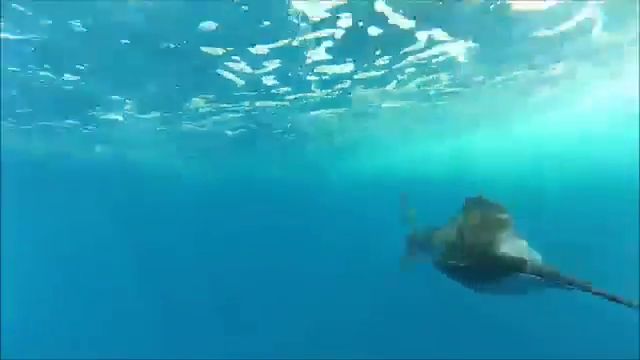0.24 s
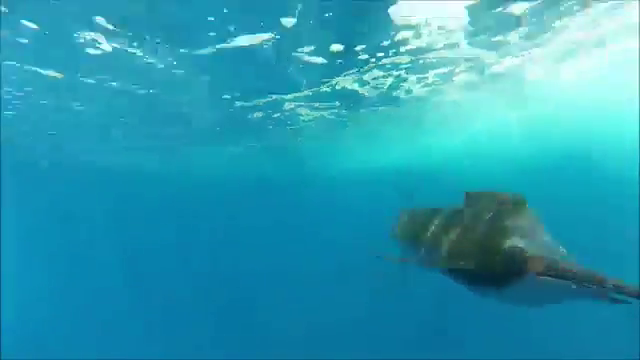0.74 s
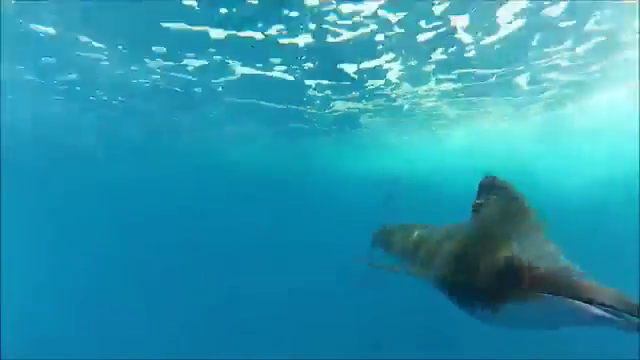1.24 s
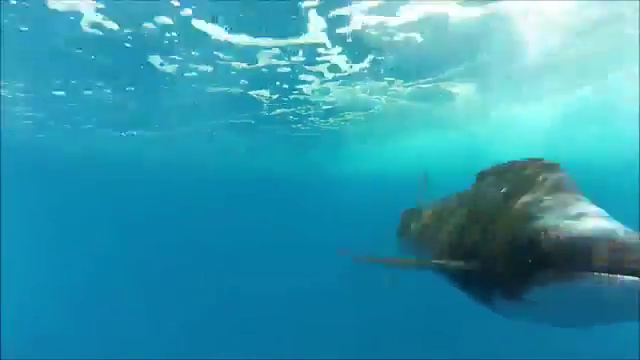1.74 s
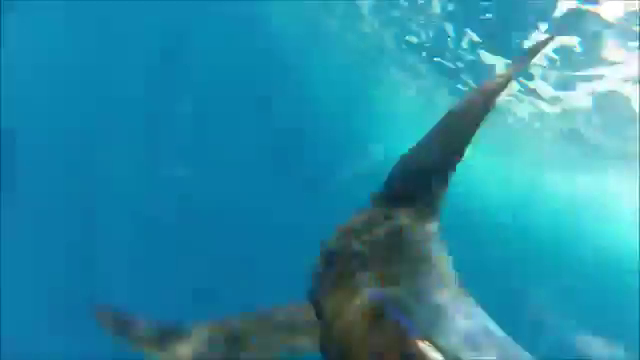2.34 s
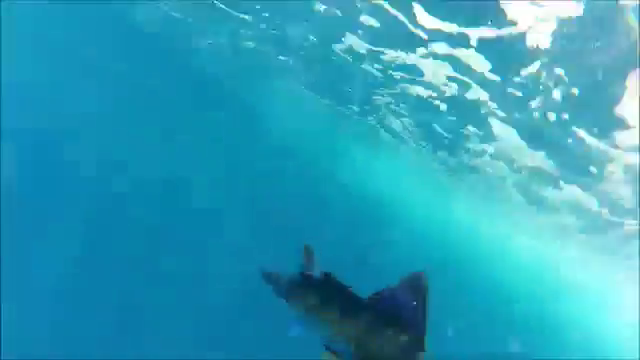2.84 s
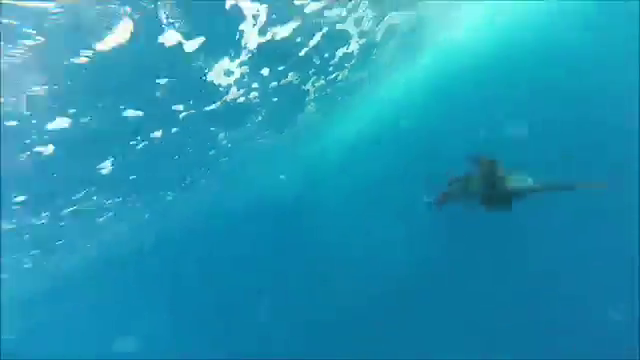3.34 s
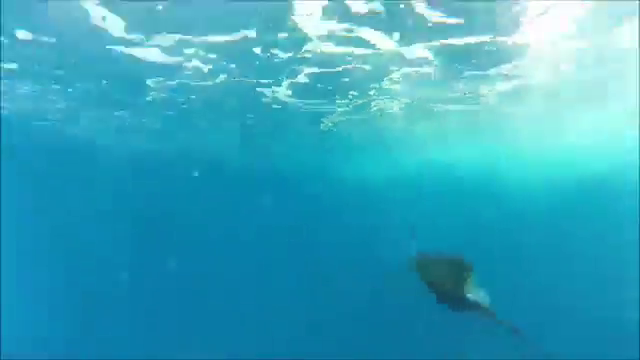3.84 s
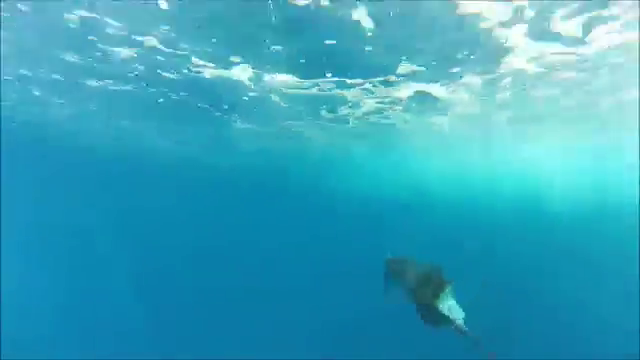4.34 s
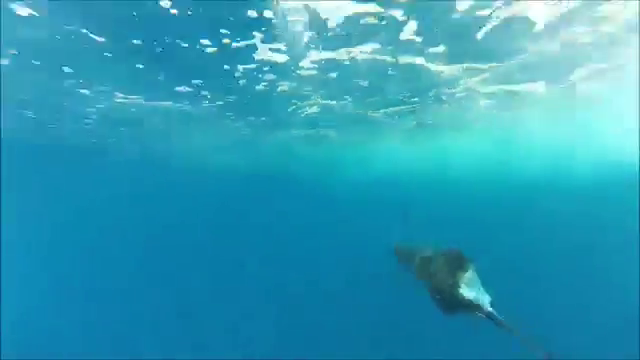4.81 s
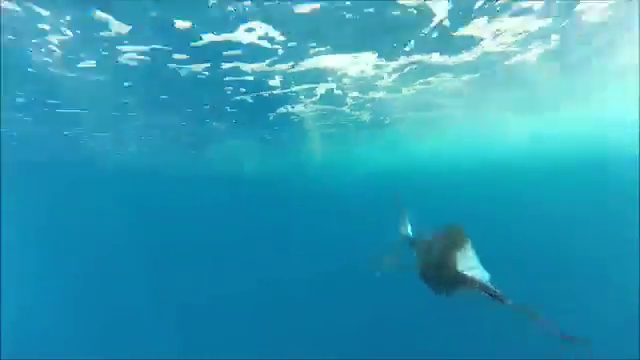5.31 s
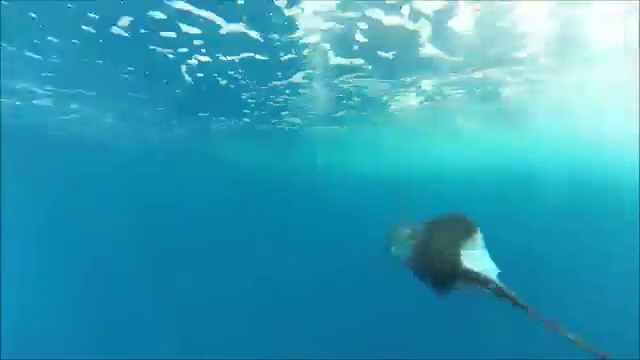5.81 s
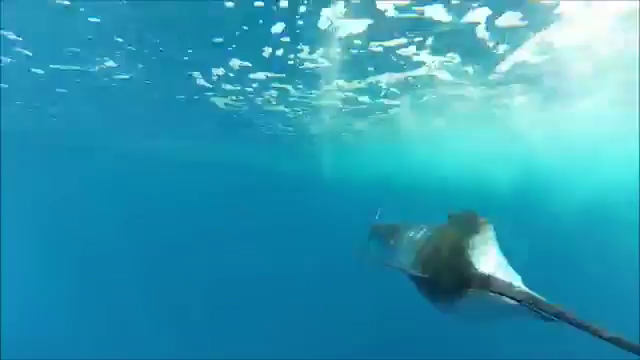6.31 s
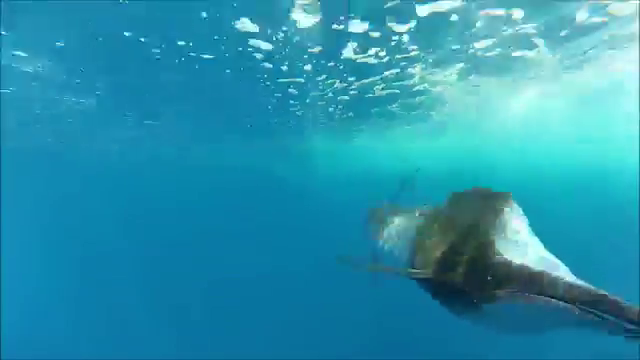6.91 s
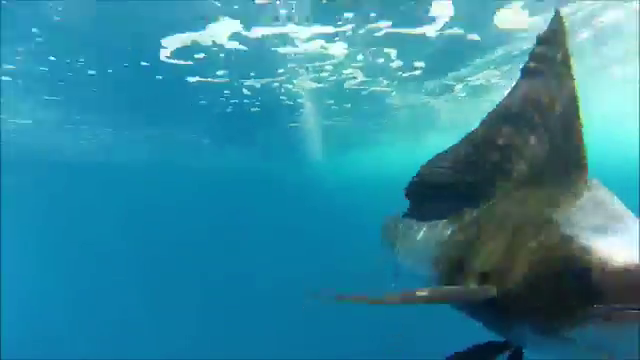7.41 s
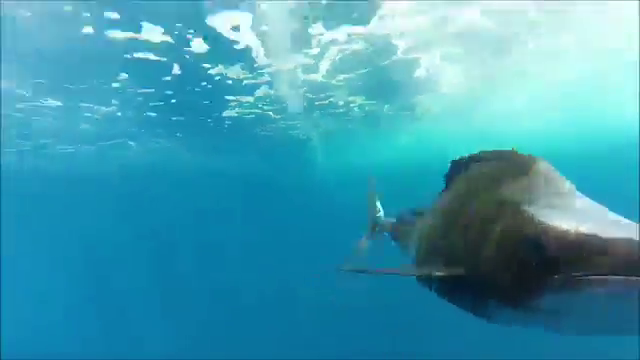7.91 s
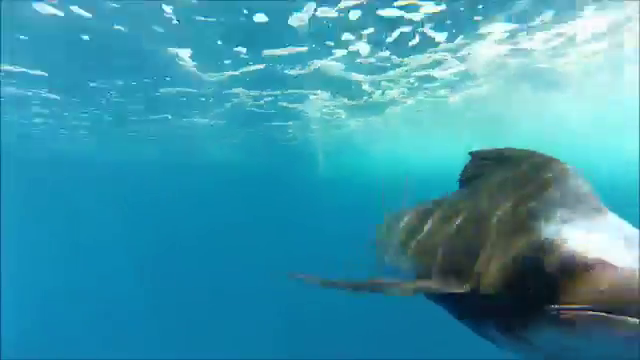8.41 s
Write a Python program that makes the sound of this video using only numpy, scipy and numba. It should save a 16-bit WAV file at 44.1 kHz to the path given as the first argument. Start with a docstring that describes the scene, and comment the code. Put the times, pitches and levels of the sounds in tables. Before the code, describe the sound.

A boat engine drones underwater for the whole eight and a half seconds, a deep, uneven throb with a wavering low hum above it. Churned wake rumbles and rushes past the towed, watertight case holding the microphone, sounding muffled and hollow, with a very faint foamy hiss. Small, faint ticks and crackles are scattered throughout. The water swells gently around 0.7, 1.6 and 2 seconds. At about 2.2 seconds a big fish hits the case: one sharp, hollow knock, by far the loudest sound, followed by a quick, softer rattle until 2.4. The engine and water drop in level and recover by about 3 seconds. Faint, tiny, high bubble pings and a thin fizz follow the knock until nearly 4 seconds. The engine keeps throbbing to the end, with stronger gushes of water around 3.8, 6.3 and 7.3 to 8 seconds.

```python
"""Just under the surface behind a motor boat, a camera is towed in a watertight case.
The engine throbs and hums through the water; the churned wake gushes through the case's resonances,
with foam and a hollow song from the thin walls on top. A big fish knocks the case once: it rattles,
swings out of the flow and sheds small bubbles. Sharp ticks and faint crackle stand for the small
steps in which the camera's gain control ducks the peaks."""
import sys
import numpy as np
from scipy import signal
from scipy.fft import rfft, irfft, next_fast_len
from scipy.io import wavfile
from scipy.ndimage import uniform_filter1d, map_coordinates
from numba import njit

SR = 44100
rng = np.random.default_rng(int(sys.argv[2]) if len(sys.argv) > 2 else 0)


def bounce(signal):
    """Save signal as a 16-bit WAV file at the path given by the first command-line argument."""
    frames = np.transpose(np.atleast_2d(signal))
    limited = np.clip(frames, -1, 1)
    pcm = np.round(limited * 32767).astype(np.int16)
    wavfile.write(sys.argv[1], SR, pcm)


N = 381906

# swells of the engine's firing tone: (centre [s], length [s], level [dB])
ENGINE_THROBS = [(0.164, 0.28, -13.5), (0.785, 0.24, -15), (1.093, 0.14, -14), (1.37, 0.23, -15.5),
                 (1.566, 0.13, -20), (1.746, 0.082, -10), (2.053, 0.3, -14.5), (2.369, 0.077, -17.5),
                 (2.572, 0.21, -15.5), (2.864, 0.19, -17), (3.124, 0.12, -18), (3.333, 0.084, -13.5),
                 (3.601, 0.3, -14.5), (4.039, 0.32, -13.5), (4.278, 0.1, -13.5), (4.539, 0.23, -12.5),
                 (4.916, 0.32, -16.5), (5.139, 0.077, -12), (5.341, 0.21, -16), (5.698, 0.24, -14.5),
                 (5.958, 0.22, -18), (6.346, 0.25, -14.5), (6.617, 0.13, -10), (6.759, 0.081, -14.5),
                 (6.989, 0.34, -15.5), (7.435, 0.4, -16), (7.682, 0.14, -11.5), (7.956, 0.14, -16),
                 (8.151, 0.1, -15.5), (8.466, 0.38, -12.5)]
# fader ride of the engine's hum: (time [s], relative level [dB])
HUM_RIDE = [(0.0, -21), (0.27, -25.5), (0.49, -13.5), (0.89, -31.5), (0.97, -17.5), (2.23, -20),
            (2.61, -33.5), (2.97, -19.5), (3.91, -18), (4.11, -30), (4.36, -15.5), (4.55, -38.5),
            (4.69, -17), (6.6, -19.5), (6.66, -33), (6.84, -18.5), (7.46, -17), (8.37, -21), (8.5, -35.5),
            (8.66, -14)]

# slow drift of the flow past the case: (time [s], strength [dB])
FLOW_DRIFT = [(0.0, -26.5), (0.22, -41.5), (0.43, -31.5), (0.85, -40.5), (1.0, -33.5), (2.1, -37.5),
              (2.36, -35.5), (2.47, -51), (2.58, -49), (2.83, -32), (3.37, -35.5), (4.2, -35.5),
              (4.63, -38.5), (4.75, -34), (5.7, -34.5), (6.32, -32.5), (6.68, -34), (7.0, -35), (7.51, -38),
              (8.66, -36)]
# gushes of churned water on top of that drift: (centre [s], length [s], rise [dB])
WAKE_GUSHES = [(0.04, 0.28, -1), (0.655, 0.25, 4.5), (1.337, 0.073, 1.5), (1.605, 0.23, 4.5),
               (1.949, 0.24, 4), (3.567, 0.17, 5), (3.841, 0.14, 8.5), (4.413, 0.14, 3.5),
               (5.273, 0.028, 4), (6.269, 0.2, 5), (6.395, 0.08, 3.5), (7.28, 0.15, 5.5),
               (7.486, 0.28, 7.5), (7.928, 0.099, 7), (8.244, 0.33, 3.5)]
# colours of the wake, from low rumble to airy hiss: (frequency [Hz], relative level [dB])
EDDY_COLOUR = [(4, -19.5), (12, 2), (33, 11), (50, 7), (72, 7), (88, -1), (130, 0), (175, 4), (230, -1.5),
               (270, -4.5), (310, -18), (450, -39), (900, -83)]
RUSH_COLOUR = [(150, -32), (250, 0), (330, -4.5), (400, -2.5), (445, -2), (500, -1), (600, -21.5),
               (900, -57.5), (3000, -100)]
WASH_COLOUR = [(350, -21.5), (600, -1.5), (850, 1), (1050, -5), (1350, -4), (1800, -14), (2200, -23),
               (2700, -24), (6000, -50), (14000, -89)]
FOAM_COLOUR = [(600, -31), (1500, 2), (1900, -5), (2400, -6), (2900, -8), (3600, -12.5), (4400, -13),
               (9000, -17.5), (13000, -23), (15500, -37), (18000, -79)]
# hollow resonances of the case in the flow: (frequency [Hz], width [Hz], relative level [dB])
CAVITY_MODES = [(392.6, 22, 0.5), (724, 63, 3.5), (912.7, 20, 7.5)]

# the fish's hit and the rattle after it: (time [s], thump level [dB], thump pitch [Hz], thump t60 [s],
# relative ring level [dB], ring tilt [dB/octave], ring time factor [ratio])
CASE_HITS = [(2.22, 41, 385, 0.0089, 11, 3, 0.45), (2.2358, -9, 240, 0.02, -36, -4, 0.5),
             (2.2634, -9.5, 453, 0.056, -13, 2.5, 0.65), (2.267, -9, 232, 0.023, -15, -4, 0.45),
             (2.2975, -10, 250, 0.066, -20, -10, 0.55), (2.3293, -5, 200, 0.027, -16.5, -1, 0.39),
             (2.3326, -19, 438, 0.038, -12, -3, 0.71), (2.3404, -13, 368, 0.025, -38, -4, 0.7),
             (2.3593, -16, 334, 0.022, -16.5, -7.5, 0.3), (2.363, -12, 208, 0.06, -33, -13, 0.91),
             (2.3769, -21, 380, 0.031, -38, 5, 0.46), (2.416, -40, 380, 0.03, -45, 1.5, 2.1)]
# ring of the struck case: (frequency [Hz], relative level [dB], free t60 [s])
SHELL_MODES = [(275, -10, 0.041), (438, -5, 0.065), (680, -11, 0.038), (840, -0.5, 0.038), (980, -1, 0.034),
               (1088, -4.5, 0.038), (1550, -13.5, 0.038), (1750, -15.5, 0.042), (2040, -11, 0.015),
               (2390, -10.5, 0.023), (2730, -16.5, 0.025), (3200, -18, 0.019), (3600, -23, 0.015)]
# rough scuff of each contact: (frequency [Hz], relative level [dB])
SCUFF_COLOUR = [(120, -11), (280, 2), (650, 5), (1150, -11.5), (1600, -15), (2800, -21.5), (4500, -27.5),
                (9000, -40), (15000, -57)]

# single bubbles pinching off the case: (time [s], relative level [dB], pitch [Hz])
BUBBLE_PINGS = [(2.396, -40, 10400), (2.498, -48, 7600), (2.614, -42, 5600), (2.637, -48, 5730),
                (2.709, -42, 7830), (2.716, -44, 8200), (2.738, -46.5, 7140), (2.765, -48, 8400),
                (2.831, -41, 10200), (2.872, -36, 5700), (2.9185, -35, 5630), (2.929, -37, 5600),
                (2.9412, -35, 5720), (2.956, -40, 10300), (3.067, -33.5, 7260), (3.067, -40, 11400),
                (3.1446, -38.5, 10350), (3.249, -33.5, 7300), (3.263, -43, 7350), (3.601, -36, 10300),
                (3.602, -41, 11300), (3.833, -30, 4860), (3.833, -32.5, 8440)]
# puffs of fine bubbles shed after the hit: (start [s], time until the fade [s], level [dB])
BUBBLE_PUFFS = [(2.22, 0.12, -62), (2.42, 0.3, -76.5), (2.72, 0.53, -68.5), (3.558, 0.29, -72.5)]
# fizz of those puffs: (frequency [Hz], relative level [dB])
FIZZ_COLOUR = [(1500, -19.5), (4000, -6), (5700, -5.5), (7500, -4), (9300, -14.5), (11200, -4.5),
               (13000, -9.5), (15500, -21)]

# the gain control's loudest ticks: (time [s], relative level [dB], ringing share of the energy [0-1])
LOUD_TICKS = [(0.1087, -52.5, 0.2), (0.1202, -59, 0.1), (0.1275, -53, 0.03), (0.14, -57.5, 0.03),
              (0.19, -53.5, 0), (0.4369, -48, 0.5), (0.7027, -43, 0.45), (0.8065, -50, 0.16),
              (0.828, -57, 0.03), (1.0595, -49.5, 0.1), (1.225, -54.5, 0.1), (1.3477, -55, 0),
              (1.366, -50, 0.02), (1.373, -54.5, 0.1), (1.526, -55, 0.06), (1.5426, -53, 0.04),
              (1.573, -49.5, 0.2), (1.5808, -57, 0.37), (1.723, -56, 0.03), (1.742, -56, 0),
              (1.763, -53, 0.05), (1.918, -54.5, 0), (2.034, -48.5, 0), (2.8074, -49.5, 0),
              (2.989, -50, 0.2), (3.1004, -52, 0.03), (3.174, -47, 0), (3.1843, -55, 0.06),
              (3.3248, -49, 0), (3.348, -56, 0.03), (3.628, -46.5, 0), (3.6355, -50, 0.05),
              (3.8324, -58, 0.1), (3.868, -46.5, 0.07), (3.9134, -52, 0), (3.946, -53, 0),
              (3.9998, -55.5, 0.03), (4.0406, -54, 0.03), (4.0904, -51.5, 0), (4.26, -50.5, 0),
              (4.449, -55, 0), (4.4605, -46.5, 0), (4.47, -52, 0.03), (4.8155, -54.5, 0.03),
              (4.927, -53, 0.03), (5.024, -55, 0.05), (5.121, -50.5, 0.07), (5.1329, -54.5, 0.18),
              (5.2954, -48.5, 0.08), (5.3916, -53.5, 0), (5.431, -48.5, 0), (5.6078, -51.5, 0.03),
              (5.865, -54.5, 0.03), (5.916, -49, 0), (6.017, -56, 0.15), (6.3264, -46.5, 0),
              (6.4162, -48, 0), (6.428, -46, 0.1), (6.5736, -53, 0.15), (6.579, -47.5, 0.2),
              (6.619, -49, 0), (6.652, -58, 0.1), (6.762, -52, 0), (6.8754, -51, 0), (6.887, -53.5, 0.03),
              (7.005, -48, 0), (7.069, -56, 0.3), (7.081, -50, 0.08), (7.516, -49.5, 0.1), (7.622, -46, 0),
              (7.6832, -49.5, 0), (7.81, -54.5, 0.03), (7.945, -50.5, 0), (7.9876, -50.5, 0.2),
              (8.1198, -50.5, 0.1), (8.2698, -50.5, 0.03), (8.366, -52.5, 0), (8.377, -52.5, 0.03),
              (8.409, -50, 0), (8.418, -53, 0.03), (8.633, -44.5, 0.05)]
# grit inside a tick: (frequency [Hz], relative level [dB])
CRACKLE_COLOUR = [(500, -18), (1500, 7.5), (2200, 4), (3600, -6.5), (4600, -5.5), (6000, -8.5), (9000, -12),
                  (13000, -14.5), (15500, -25)]

# resonances of the thin walls: (frequency [Hz], width [Hz], relative level [dB])
WALL_MODES = [(2230, 230, -2.5), (3500, 170, -10.5)]
# fader ride of the walls' song: (time [s], level at cruising flow [dB])
WALL_RIDE = [(0, -74.5), (2.6, -75.5), (3.2, -71), (4.5, -73), (4.8, -69), (6.2, -67), (7.5, -67),
             (8.66, -70.5)]


def engine(firing_hz, hum_harmonic=4, scatter_db=-24.5, hum_trim_db=-2, octave_db=-22):
    """The firing tone throbs through the wake, each swell by a new path; a harmonic hums and wavers."""
    t = np.arange(N) / SR
    phase = 2 * np.pi * firing_hz * t
    throbs = sum(amp(db) * bell(t, s, length) * np.sqrt(2) * np.sin(phase + 2 * np.pi * rng.random())
                 for s, length, db in ENGINE_THROBS)
    bed = amp(scatter_db) * scattered_tone(phase + 1.4 * wobble(7), scatter=0.64, flutter_rate=26)
    hum_phase = hum_harmonic * phase + 1.3 * wobble(10)
    hum = scattered_tone(hum_phase, scatter=0.6, flutter_rate=36)
    octave = amp(octave_db) * scattered_tone(2 * hum_phase, scatter=0.5, flutter_rate=23)
    return throbs + bed + amp(ride(HUM_RIDE) + hum_trim_db) * (hum + octave)


def scattered_tone(phase, scatter, flutter_rate):
    """A tone flutters against its own copy, scattered by the moving surface and bubbles."""
    paths = 1 + scatter * (wobble(flutter_rate) + 1j * wobble(flutter_rate))
    return unit(np.real(paths * np.exp(1j * phase)))


def wake(flow_db):
    """Eddies buffet the case, churned water sounds its cavity, foam hisses; all swell with the flow."""
    churn = wobble(24)
    eddies = amp(-20 + flow_db + 1.7 * wobble(11)) * noise(EDDY_COLOUR)
    rush = amp(-31 + 1.23 * flow_db + 1.5 * churn) * resonate(noise(RUSH_COLOUR), CAVITY_MODES)
    wash = amp(-46.5 + flow_db + 1.2 * churn) * resonate(noise(WASH_COLOUR), CAVITY_MODES)
    flutter_db = 1.4 * churn + 1.5 * wobble(71)
    foam = amp(-63.5 + 0.62 * flow_db + flutter_db) * resonate(noise(FOAM_COLOUR), WALL_MODES)
    return eddies + rush + wash + foam


def flow(cruise_db=-32):
    """The push of the water in dB above cruising: a slow drift plus a swell for each gush."""
    t = np.arange(N) / SR
    gushes = sum(rise_db * bell(t, s, length) for s, length, rise_db in WAKE_GUSHES)
    return ride(FLOW_DRIFT) + gushes - cruise_db


def fish_knock():
    """The fish hits the case, which thumps hollowly, scuffs and rattles on its tow line."""
    hits, scuff_envelope = np.zeros(N), np.zeros(N)
    t = np.arange(SR // 8) / SR
    attack = 1 - np.exp(-t / 0.00013)  # water cushions each blow
    for s, thump_db, thump_hz, thump_t60, ring_db, tilt_db, ring_scale in CASE_HITS:
        shell = sum((-1) ** k * ring(t, hz, db + tilt_db * np.log2(hz / 860) + rng.normal(),
                                     t60 * ring_scale)
                    for k, (hz, db, t60) in enumerate(SHELL_MODES))
        thump = ring(t, thump_hz, thump_db, thump_t60)
        shove = ring(t, hz=150, db=ring_db - 0.5, t60=0.022)  # the whole case is jolted
        add(hits, s, amp(ring_db + 0.5) * attack * shell - thump - shove)
        add(scuff_envelope, s, amp(ring_db - 9.5) * attack * np.exp(-t / (0.013 * ring_scale)))
    return hits + scuff_envelope * noise(SCUFF_COLOUR)


def bubbles(attack_s=0.00036, decay_s=0.0024):
    """Single bubbles pinch off the case, each with a tiny, rough ping."""
    out, t = np.zeros(N), np.arange(SR // 25) / SR
    envelope = np.exp(-t / decay_s) * (1 - np.exp(-t / attack_s))
    for s, db, hz in BUBBLE_PINGS:
        jitter = 0.2 * np.cumsum(rng.standard_normal(len(t)))  # a wobbling bubble has no pure pitch
        add(out, s, amp(db - 4) * envelope * np.sin(2 * np.pi * hz * t + jitter))
    return out


def bubble_cloud(rise_s=0.03, fade_db_per_s=65, sparkle_db=8):
    """Puffs of fine bubbles rise, hold and fade, fizzing in bursts that keep changing pitch."""
    t = np.arange(N) / SR
    spectrum = signal.stft(noise(FIZZ_COLOUR), nperseg=256)[2]
    patches = uniform_filter1d(rng.standard_normal(spectrum.shape), size=9, axis=0)  # smear in pitch
    patches = unit(uniform_filter1d(patches, size=2, axis=1))  # and in time
    fizz = signal.istft(spectrum * amp(sparkle_db * patches), nperseg=256)[1][:N]
    puffs = sum(np.clip((t - s) / rise_s, 0, 1) * amp(db - fade_db_per_s * np.maximum(t - s - hold, 0))
                for s, hold, db in BUBBLE_PUFFS)
    return puffs * unit(fizz)


def ticks(flow_db, firing_hz, faint_count=140, loud_rise_s=0.0012, faint_rise_s=0.00045, ring_hz=3570):
    """Gain-step crackle: cued ticks of grit and ping with softer doubles, and faint ones at random."""
    out, t = np.zeros(N), np.arange(SR // 50) / SR
    crackle = amp(4.3 * wobble(2000)) * noise(CRACKLE_COLOUR)
    loud = [(s, db, ring_share, loud_rise_s) for s, db, ring_share in LOUD_TICKS]
    faint = [(i / SR, -60.5 + 4 * accent + 0.27 * flow_db[i], 0.024, faint_rise_s)
             for i, accent in zip(rng.integers(N, size=faint_count), rng.standard_normal(faint_count))]
    doubles = []
    for s, db, ring_share in LOUD_TICKS:
        side, accent = rng.standard_normal(2)
        offset_s = np.sign(side) * np.ceil(abs(side)) / (2 * firing_hz)  # half cycles of the engine
        doubles.append((s + offset_s, db - 14 + 4 * accent, ring_share, loud_rise_s))
    for s, db, ring_share, rise_s in loud + doubles + faint:
        burst = pulse(t, rise_s)
        grit = unit(burst * crackle[rng.integers(N - len(t)):][:len(t)])
        phase = 2 * np.pi * ring_hz * (1 + 0.023 * rng.normal()) * t
        ping = unit(pulse(t, rise_s=0.00051) * (np.sin(phase) + amp(-9.5) * np.sin(2 * phase)))
        blend = np.sqrt(1 - ring_share) * grit + np.sqrt(ring_share) * ping
        burst_rms = np.sqrt(np.mean(burst ** 2))
        add(out, max(s - rise_s, 0), amp(db + 6.5) * burst_rms * blend)
    return out


def wall_song(flow_db):
    """The thin walls of the case sing hollowly in the stream."""
    bands = lambda f: sum(amp(db) / (1 + ((f - hz) / width) ** 4) for hz, width, db in WALL_MODES)
    song = unit(filtered(rng.standard_normal(N), bands))
    return amp(ride(WALL_RIDE) + 0.62 * flow_db) * song


def amp(db):
    """Decibels to gain."""
    return 10 ** (np.asarray(db) / 20)


def unit(x):
    """Scale to rms 1."""
    return x / np.sqrt(np.mean(x ** 2) + 1e-20)


def ride(points):
    """A fader ride: straight lines between (time [s], level [dB]) points."""
    return np.interp(np.arange(N) / SR, *np.transpose(points))


def bell(t, centre_s, length_s):
    """A smooth swell up to 1 and back."""
    return np.exp(-(2 * (t - centre_s) / length_s) ** 2)


def pulse(t, rise_s):
    """An envelope that peaks at rise_s and tails off."""
    return (t / rise_s) ** 2 * np.exp(2 - 2 * t / rise_s)


def wobble(rate):
    """Smooth random modulation, rate points a second."""
    return map_coordinates(rng.standard_normal(int(N * rate / SR) + 4), [np.arange(N) * rate / SR])


def filtered(x, response):
    """EQ x with a gain given as a function of frequency."""
    size = next_fast_len(N + SR // 2)
    return irfft(rfft(x, size) * response(np.fft.rfftfreq(size, 1 / SR)), size)[:N]


def noise(colour):
    """Noise of rms 1, shaped by (frequency [Hz], relative level [dB]) points."""
    hz, db = np.transpose(colour)
    eq = lambda f: amp(np.interp(np.log(f + 1), np.log(hz), db))
    return unit(filtered(rng.standard_normal(N), eq))


def resonate(x, modes):
    """Lift x around each resonance, then scale to rms 1."""
    eq = lambda f: 1 + sum(amp(db) * 1j * f * width / (hz * hz - f * f + 1j * f * width)
                           for hz, width, db in modes)
    return unit(filtered(x, eq))


def ring(t, hz, db, t60):
    """One struck mode, dying by 60 dB in t60 seconds."""
    return amp(db) * np.exp(-np.log(1000) * t / t60) * np.sin(2 * np.pi * hz * t)


def add(track, s, sound):
    """Mix a sound into the track at s seconds."""
    part = track[round(s * SR):][:len(sound)]
    part += sound[:len(part)]


@njit
def gain_control(x, limit, max_duck_db_per_s, recover_db_per_s):
    """Gain in dB: ducks fast while the output passes the limit, then creeps back up."""
    gain_db, now_db = np.zeros(len(x)), 0.0
    for i in range(len(x)):
        overshoot = min(abs(x[i]) * 10 ** (now_db / 20) / limit - 1, 1.0)
        if overshoot > 0:
            now_db -= max_duck_db_per_s / SR * overshoot
        else:
            now_db = min(now_db + recover_db_per_s / SR, 0.0)
        gain_db[i] = now_db
    return gain_db


def scene(firing_hz=50.35):
    """The mono mix: engine and wake, the knock, then the fine detail."""
    flow_db = flow()
    mix = engine(firing_hz) + wake(flow_db) + fish_knock()
    detail = ticks(flow_db, firing_hz) + bubbles() + bubble_cloud() + wall_song(flow_db)
    return (mix + detail)[None]


def record(dry, step_db=0.12, ceiling=0.97, top_hz=15600):
    """The camera ducks peaks in small steps, flattens what still overloads and cuts the extreme highs."""
    gain_db = gain_control(dry[0], limit=0.27, max_duck_db_per_s=700.5, recover_db_per_s=29.5)
    ducked = dry[0] * amp(step_db * np.round(gain_db / step_db))
    edge_fades = signal.windows.tukey(N, 0.002)
    limited = edge_fades * np.clip(ducked, -ceiling, ceiling)
    return filtered(limited, lambda hz: 1 / (1 + (hz / top_hz) ** 70))[None]


dry = scene()
out = record(dry)
bounce(out)
```